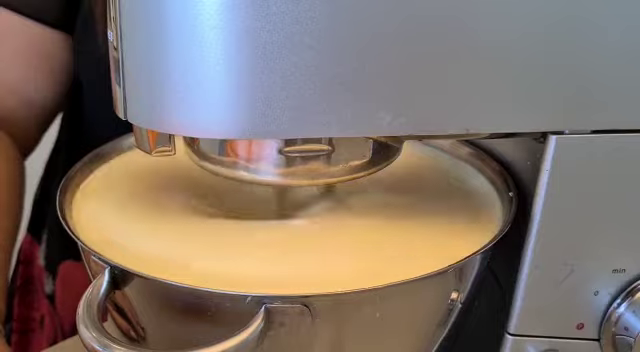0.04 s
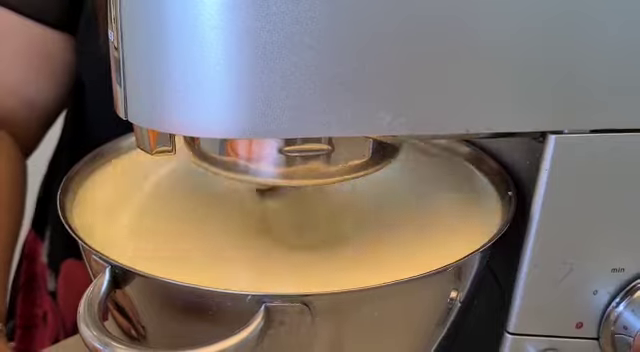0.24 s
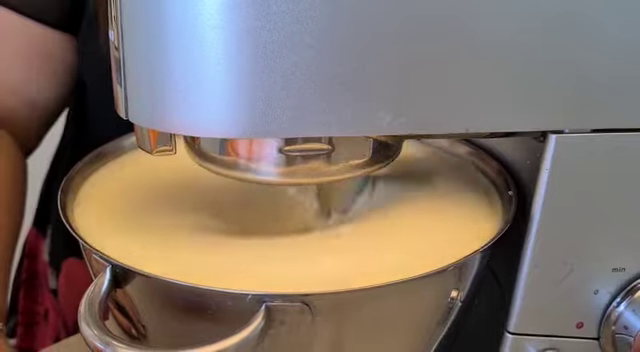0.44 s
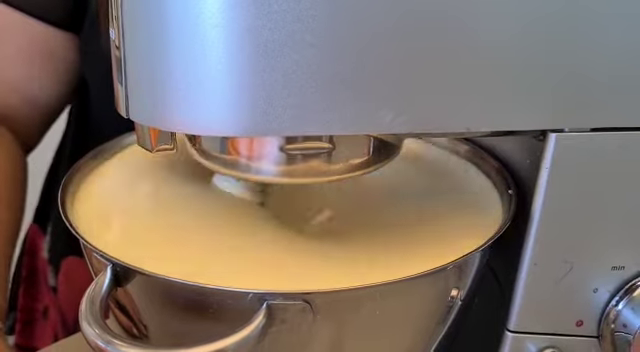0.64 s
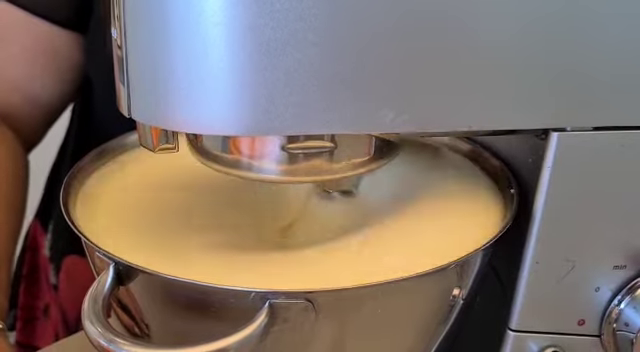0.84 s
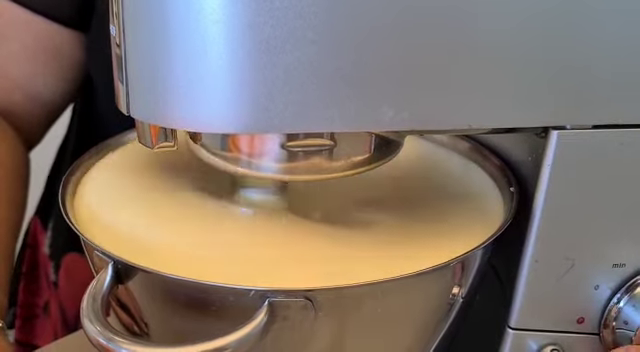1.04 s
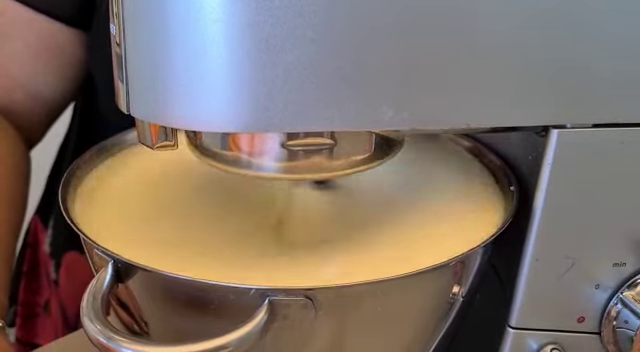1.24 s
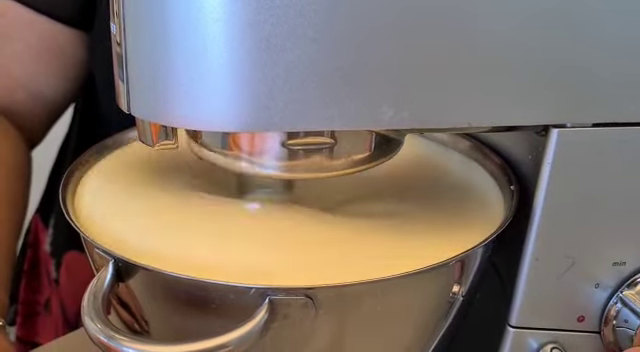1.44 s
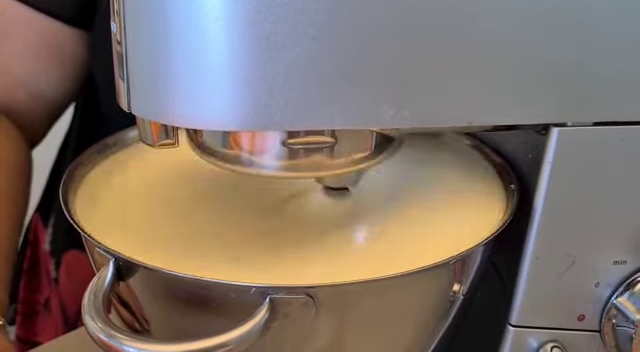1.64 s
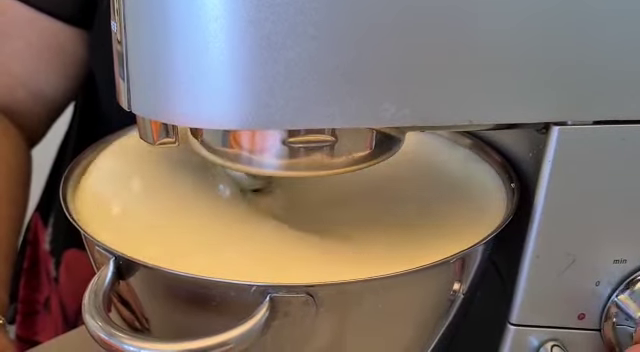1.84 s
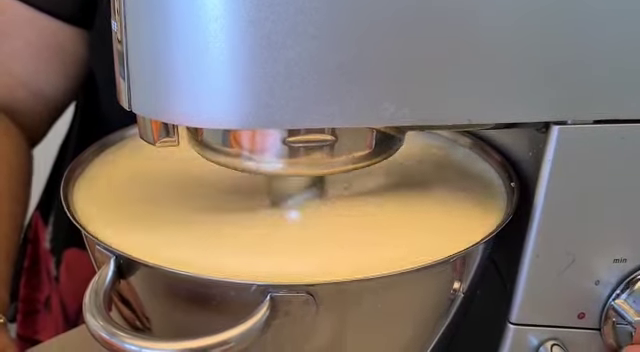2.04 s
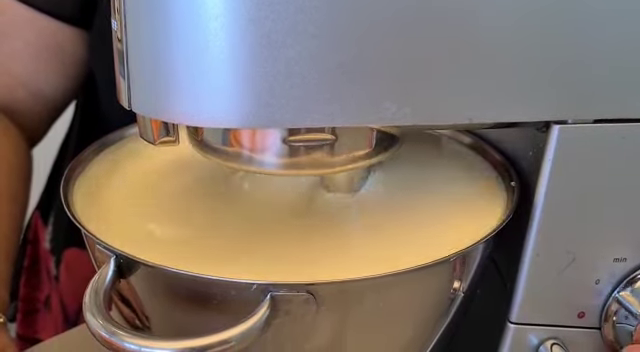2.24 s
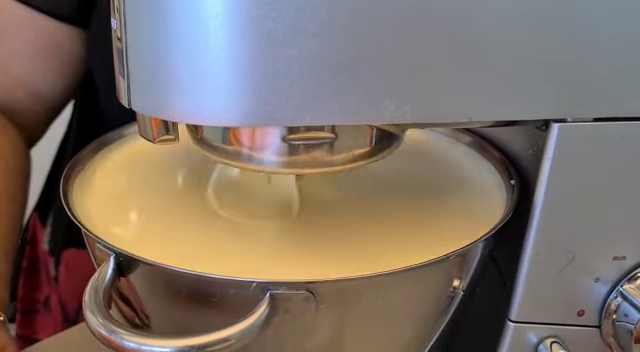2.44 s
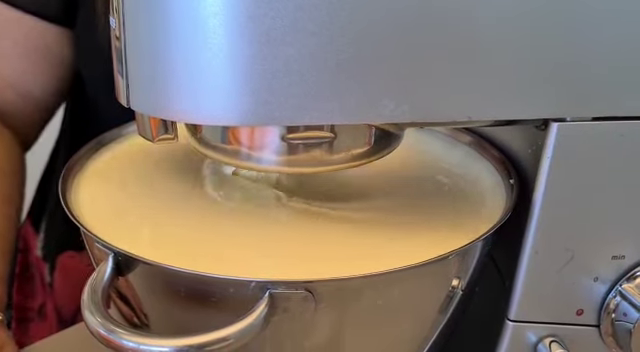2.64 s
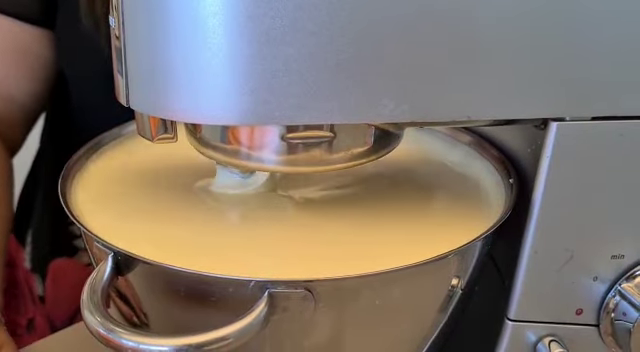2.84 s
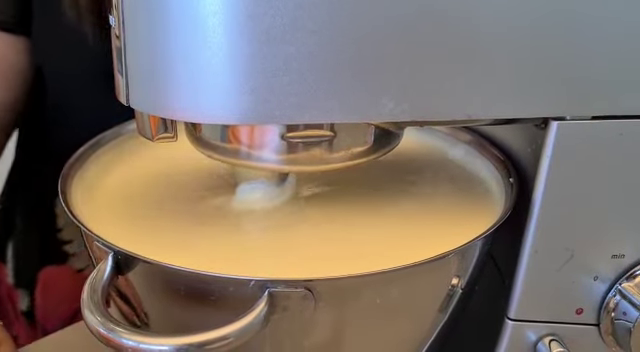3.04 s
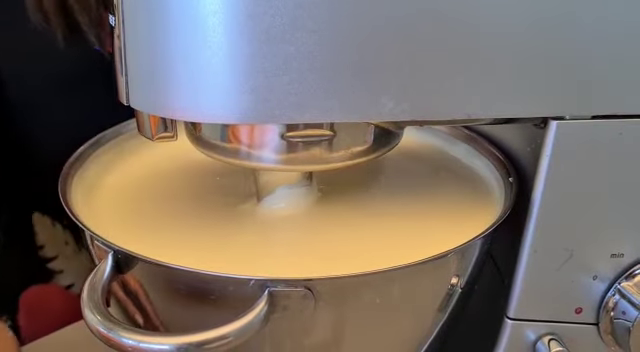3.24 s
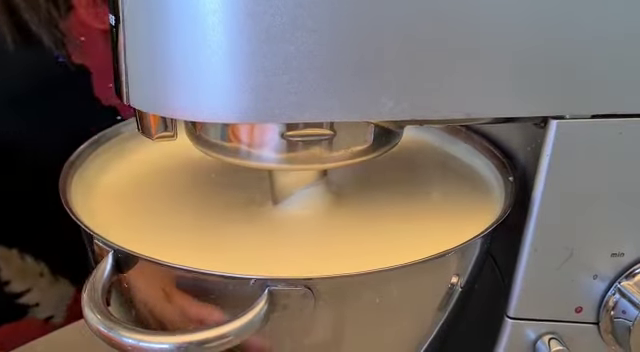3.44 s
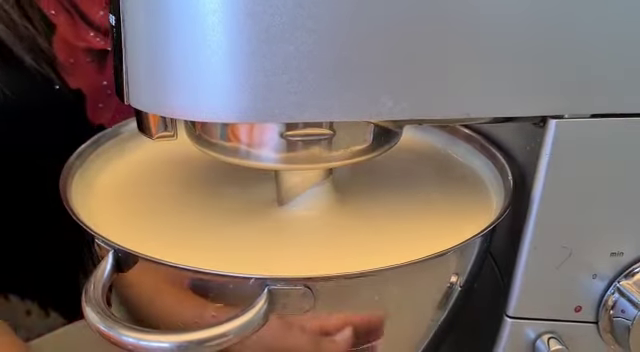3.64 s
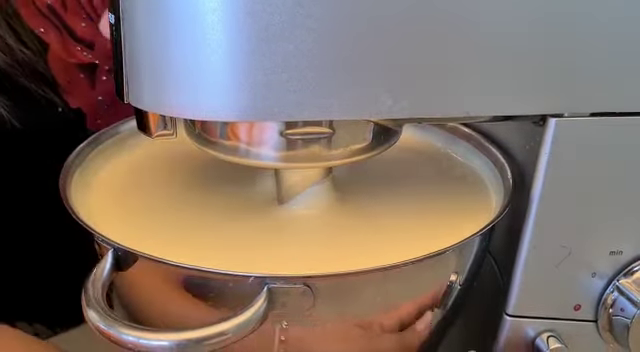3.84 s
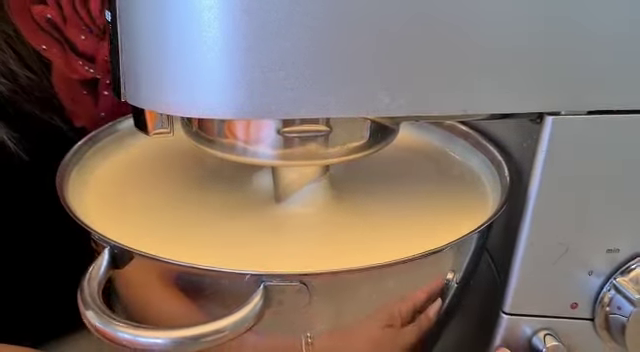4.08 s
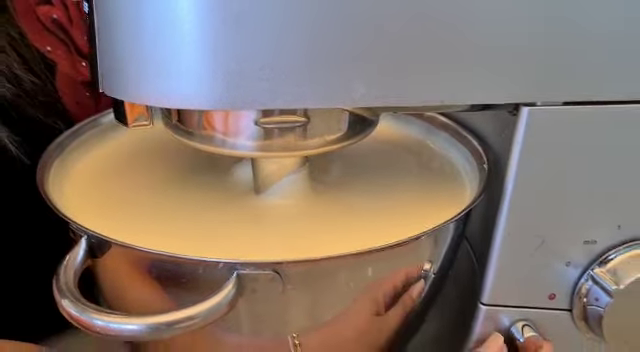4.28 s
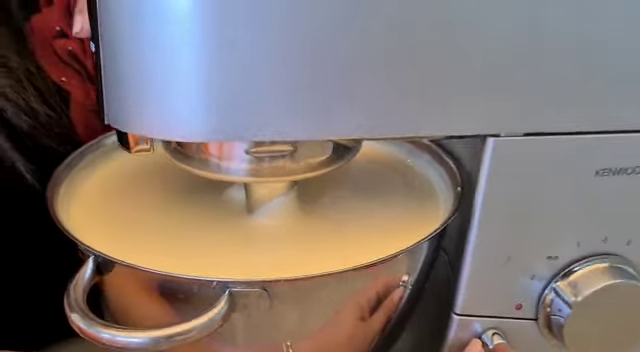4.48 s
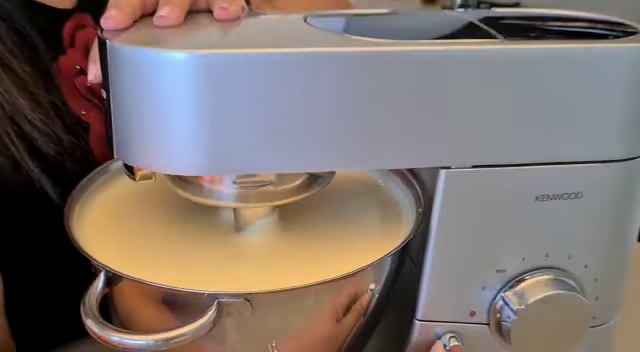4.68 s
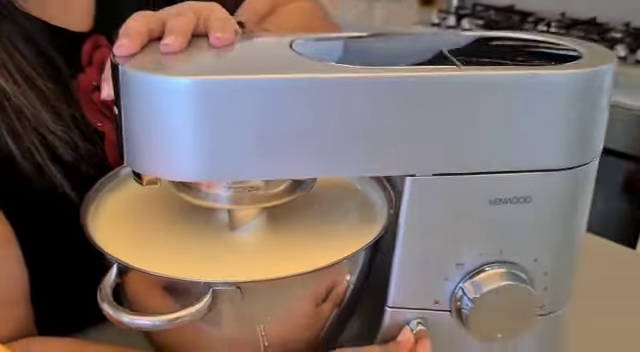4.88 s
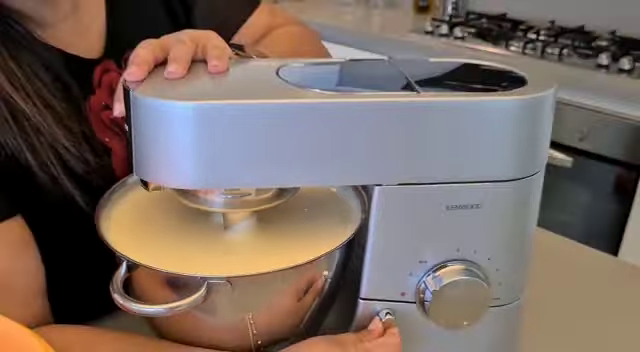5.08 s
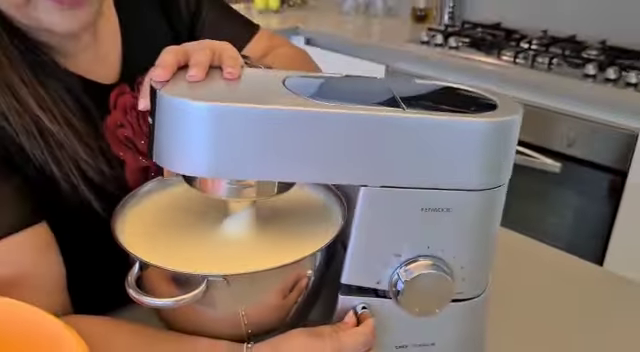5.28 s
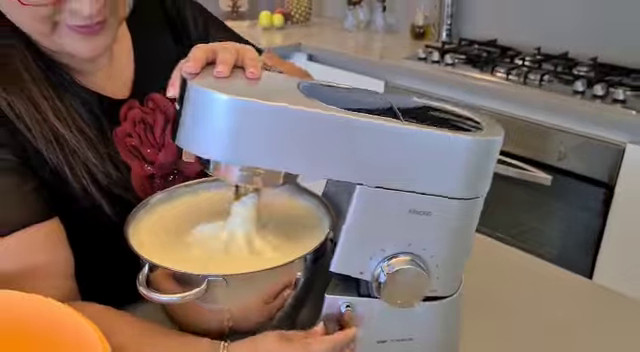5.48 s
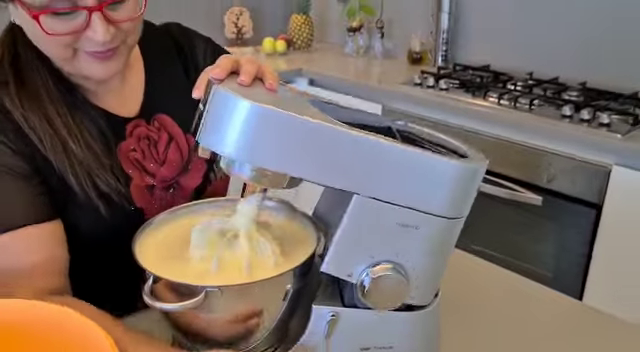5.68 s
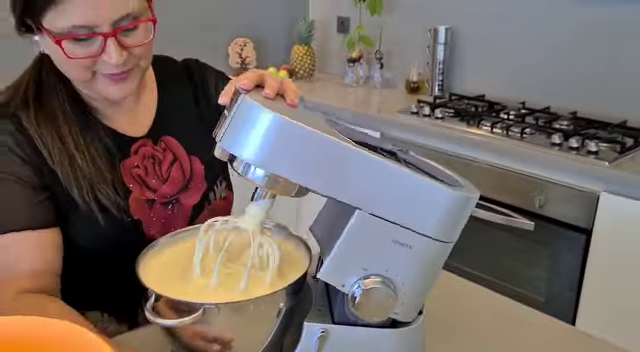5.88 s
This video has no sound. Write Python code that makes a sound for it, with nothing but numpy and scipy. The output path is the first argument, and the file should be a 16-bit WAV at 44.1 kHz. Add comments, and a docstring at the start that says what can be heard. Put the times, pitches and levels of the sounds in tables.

```python
"""A stand mixer beats batter, is switched off and coasts: rotor, gear and commutator tones slide down with
the speed over shaped noise for growl, whirr and hiss. Whisk wires tick on the steel bowl as decaying modes.
The release lever clacks as noise bursts and struck housing modes, then the head rubs up on its hinge as
rough noise. Noise in two bands is the kitchen background, which steps up once. Two microphones, close by."""
import sys
import numpy as np
from scipy import signal
from scipy.fft import rfft, irfft, next_fast_len
from scipy.io import wavfile
from scipy.ndimage import uniform_filter1d, map_coordinates

SR = 44100
rng = np.random.default_rng(int(sys.argv[2]) if len(sys.argv) > 2 else 0)


def wav_record(signal):
    """Record a signal, one row per channel, as 16-bit PCM in the file named by sys.argv[1]."""
    frames = np.transpose(np.atleast_2d(signal))
    bounded = np.clip(frames, -1, 1)
    # unit amplitude maps onto the largest positive 16-bit level
    quanta = np.round(bounded * 32767).astype(np.int16)
    wavfile.write(sys.argv[1], SR, quanta)


N = 260861
T = np.arange(N) / SR  # s

# Rotor speed: (time [s], speed [turns/s])
ROTOR_SPEED = [(0, 182), (.65, 182), (.8, 179), (1.0, 174.6), (1.15, 171.8), (1.28, 167.5), (1.4, 157.5),
               (1.65, 131.6), (1.9, 113), (2.2, 86.5), (2.5, 65), (2.8, 46), (3.1, 29.5), (3.5, 12)]
# Rotor imbalance shaking the stand: (rotor speed [turns/s], level [dB])
UNBALANCE = [(35, -90), (66, -71), (88, -62), (105, -58), (145, -52), (165, -65), (182, -71)]
# Stand modes the mesh tone slides through; response is squared: (frequency [Hz], width [Hz], level [dB])
FRAME_MODES = [(255, 45, 8), (340, 28, 4), (492, 22, 2), (530, 16, 0), (558, 14, -3)]
# Lines around the commutator bar rate: (offset [rotor turns], relative level [dB], blur [rotor turns])
SIDEBANDS = [(-2, -13, .3), (-1, -6, .2), (0, 1, .04), (0, -2, .5), (1, -5, .15), (2, -8, .25),
             (4, -13, .3)]
# Whine harmonics 2 to 4: relative level [dB]
HARMONICS_DB = [1, -8, -12.5]
# Whine leaving the casing, fundamental: (frequency [Hz], relative level [dB])
RADIATED = [(400, -65.5), (750, -74), (1200, -66), (1600, -56.5), (2600, -56.5), (3100, -56), (3380, -56),
            (3700, -54.5), (4370, -58)]
# Whine leaving the casing, harmonics: (frequency [Hz], relative level [dB])
RADIATED_HIGH = [(1000, -88), (1600, -72), (2200, -76), (3100, -75), (3800, -72), (4600, -71.5),
                 (5300, -74), (6200, -68), (7000, -66), (8200, -70), (8740, -62), (9600, -75), (11400, -69),
                 (13100, -64)]
# Motor casing modes: (frequency [Hz], width [Hz], level [dB])
CASING_MODES = [(620, 26, 5), (738, 26, 16.5), (842, 45, 13.5), (1150, 43, 14.5), (1580, 60, 12),
                (2073, 76, 13), (2480, 49, 3), (2820, 45, 8), (3113, 84, 13), (3480, 140, 6.5),
                (4570, 290, 1)]
# Tones under drive: (multiple of rotor speed, level at each of three dial settings [dB])
LOADED_TONES = [(4.165, -62.5, -61, -72), (8.33, -57.5, -64.5, -58.5), (11.5, -60.5, -62, -71),
                (12, -55, -66, -62), (12.55, -69, -61, -56.5)]
# Starts of the two dial steps: time [s]
DIAL_DOWN_S = [0.69, 1.05]
# Magnetic hum: (frequency [Hz], level [dB])
MAINS_HUM = [(102, -65), (204, -51.5), (302, -55.5), (404, -56.5), (528, -65)]
# Gearbox growl spectrum: (frequency [Hz], relative density [dB])
GROWL = [(18, -57), (30, -22), (91, -13), (124, -14), (194, -1.5), (226, -6), (310, 0.5), (429, -8.5),
         (539, -5.5), (668, -17), (737, -13), (900, -17.5), (1170, -48), (1980, -120)]
# Air whirr spectrum: (frequency [Hz], relative density [dB])
WHIRR = [(350, -49), (600, -8.5), (741, -8.5), (1000, -2), (1110, 0), (1350, -7), (1530, -2.5),
         (1940, -4.5), (2140, -3.5), (2330, -5.5), (3410, -9), (4500, -19.5), (5850, -23), (9900, -120)]
# Brush hiss spectrum: (frequency [Hz], relative density [dB])
HISS = [(2350, -73), (4000, -12), (4370, -3.5), (5430, -9.5), (6990, -4.5), (7670, -14), (8630, -7),
        (9880, -12), (11600, -5), (14000, -16.5), (15500, -20), (16300, -34.5)]
# Whisk touches: (time [s], relative level [dB])
TICKS = [(0.0343, -29.5), (0.097, -36.5), (0.1366, -38), (0.179, -42), (0.2478, -45), (0.343, -34.5),
         (0.407, -33), (0.446, -36.5), (0.4918, -44), (0.656, -44), (0.72, -33.5), (0.759, -34.5),
         (0.873, -39.5), (1.039, -36.5), (1.08, -31), (1.1468, -36.5), (1.1902, -41), (1.311, -39),
         (1.3768, -43), (1.4194, -36), (1.495, -35.5), (1.546, -36), (1.698, -44), (1.8462, -45),
         (1.9502, -38), (1.959, -49), (2.0202, -38.5), (2.031, -49), (2.147, -43), (2.2473, -49),
         (2.3376, -52), (2.5176, -60), (2.6885, -46), (2.7095, -53), (2.8355, -55), (2.8589, -60),
         (3.1682, -53), (3.2093, -53)]
# Whisk wire modes: (frequency [Hz], relative level [dB], t60 [s])
WIRE_MODES = [(2520, -9, .03), (3660, -7, .014), (4370, 6, .01), (5240, 0, .012), (6150, 0, .016),
              (9300, 3, .012), (10500, 0, .012), (11680, 2, .016), (13100, -5, .01), (14400, -8, .009)]
# Bowl wall mode: (frequency [Hz], relative level [dB], t60 [s])
BOWL_MODE = (7150, 0, 0.025)
# Timbre around the bowl: (share of the round, low modes [dB], bowl mode [dB])
WALL = [(0.02, -5, -5), (0.11, -17, -3), (0.31, -4.5, -8), (0.43, -16, 2), (0.58, -4, -5),
        (0.65, -1.5, -15), (0.78, -11, 2)]
# Lever contacts: (time [s], relative level [dB], treble [dB], body [dB], thud [dB], rattle [dB])
LEVER_CONTACTS = [(4.783, -48.5, -15, -3, 0, 0), (4.846, -30.5, -9, 3, -1, -4), (4.856, -21, 3.5, 5, 0, 4),
                  (4.861, -23, 0.5, 0, -1.5, 0), (4.88, -25, -5.5, -1, 0, 5.5),
                  (4.899, -28, -5, -6, -1.5, 0), (5.153, -33, -14, -2.5, -10, -8),
                  (5.162, -35, -2, -4, 8, -6), (5.177, -45.5, -2, 10.5, 1, -6),
                  (5.334, -41.5, -18, -4, 10, 8), (5.821, -41.5, -6.5, 8, -3, 3.5)]
# Contact burst spectrum: (frequency [Hz], relative density [dB])
CLACK = [(47, -50), (80, -7), (228, 1.5), (260, 0.5), (332, -9), (485, -3), (707, -16), (987, -5.5),
         (1400, -12), (1760, -10), (2060, -2), (3100, -7), (5120, -16), (11400, -13), (16300, -29)]
# Housing modes: (frequency [Hz], width [Hz], relative level [dB])
HOUSING_MODES = [(200, 71, -6.5), (356, 53, 0), (481.5, 24, 5.5), (980, 100, 2.5), (1495, 120, 3.5),
                 (2000, 180, 3), (2130, 83, 3), (3110, 57, 0.5), (3760, 64, -30), (4860, 470, -33),
                 (6830, 210, -6), (10340, 450, -10.5)]
# Head slides: (start [s], length [s], level [dB], shudder re slide [dB], fade after the slide [dB/s])
SLIDES = [(5.307, 0.19, -47.5, -9, 196), (5.52, 0.12, -56.5, -16, 60), (5.8, 0.062, -66.5, -9, 60)]
# Hinge rub spectrum: (frequency [Hz], relative density [dB])
RUB = [(240, -30), (400, 4.5), (536, -2), (777, -7.5), (950, -2), (1140, -7.5), (1270, -4), (1500, -4),
       (1850, 4), (2150, -3), (2500, -1.5), (2970, -1.5), (3310, -11), (3750, -5.5), (4300, -8.5),
       (4700, -18), (5200, -17.5), (6300, -22.5), (7200, -23.5), (7700, -30.5), (10200, -29), (16000, -47)]
# Arm modes singing in the rub: (frequency [Hz], width [Hz], relative level [dB])
STREAKS = [(903, 40, -10), (1270, 17, -4), (1915, 54, -1), (2400, 46, 3), (2990, 23, 0.5), (3750, 90, 1),
           (4660, 80, -12), (7140, 130, -15)]
# Kitchen background: (time [s], low band level [dB], high band level [dB])
AIR_LEVELS = [(2.9, -62.5, -66), (3.77, -65.5, -71.5), (3.79, -59, -64.5), (4.45, -59.5, -64),
              (4.83, -58.5, -61.5), (5.3, -62.5, -63.5), (5.9, -61, -62.5)]
# Background low band: (frequency [Hz], relative density [dB])
AIR_LOW = [(15, -47), (25, -23.5), (75, -13), (113, -9.5), (188, -2.5), (303, -9), (335, -10), (461, -13),
           (800, -25.5), (1040, -47), (1760, -120)]
# Background high band: (frequency [Hz], relative density [dB])
AIR_HIGH = [(320, -30), (550, -7.5), (959, -4.5), (1180, -5), (1300, -7), (1930, -7), (3200, -16),
            (3510, -20), (5360, -32), (5800, -28), (7260, -35.5), (11100, -34.5), (12200, -36),
            (13000, -69)]
# Kitchen reverberation: (frequency [Hz], t60 [s])
KITCHEN_T60 = [(150, 0.39), (1000, 0.63), (4000, 0.89), (12000, 0.41)]
# Stereo likeness: (frequency [Hz], left-right correlation)
ALIKE = [(60, 0.98), (230, 0.985), (380, 0.8), (950, 0.4), (2380, 0.03), (5980, -0.14), (15000, 0.02)]
# Stereo balance: (frequency [Hz], left over right [dB])
LEAN = [(60, -0.5), (130, 0), (290, -2.5), (640, -2), (1410, -2), (3100, -3.5), (6820, -3), (15000, -1.5)]
# Stereo phase: (frequency [Hz], left lead [rad])
LAG = [(500, 0), (1100, .4), (2200, -1.9), (3100, -3.3)]

SWITCH_OFF_S, REST_S = 1.44, 3.5  # current is gone, its fade starts 0.128 s before; motor and drive silent
BARS = 24  # commutator bars per rotor turn
DRIVEN_BLUR = 0.4  # share of the whine's blur left while current steadies the rotor
MESH_ORDER, MESH_DB, MESH_DB_OCT = 3.07, -54, 12  # multiple of rotor speed, gain before the frame, dB/octave
GROWL_DB, WHIRR_DB, HISS_DB = -44.5, -49.5, -57  # at full speed under current
GROWL_DB_OCT, WHIRR_DB_OCT, HISS_DB_OCT = 10, 9, 13  # lost per halving of speed
UNLOADED_DB = -1.5  # drive gain without current
ORBIT_TURNS = 56.8  # rotor turns per whisk round
RING_DB = 27  # housing ring gain
RATTLES_PER_S, RATTLE_DB, RATTLE_T60_S = 350, -10.5, 0.28
SLIDE_RISE_S, SLIDE_TREBLE_DB, STREAK_DB = 0.066, -15.5, -17
TOP_HZ = 16200


def motor():
    """Shaft, mesh and whine follow the rotor; hum and load tones fade with the current."""
    turns, = curves(ROTOR_SPEED)
    running = np.clip((REST_S - T) / 0.048, 0, 1)
    current = np.clip((SWITCH_OFF_S - T) / 0.128, 0, 1)
    return running * (shaft(turns) + whine(turns, current)) + current * (load_tones(turns) + mains_hum())


def shaft(turns):
    """Rotor imbalance and gear mesh, the mesh coloured by the stand's modes."""
    octaves = np.log2(turns / turns[0])
    mesh_hz = MESH_ORDER * turns
    frame = sum(abs(resonances([mode])(mesh_hz)) ** 2 for mode in FRAME_MODES)
    mesh_gain = amp(MESH_DB + MESH_DB_OCT * octaves) * frame * amp(4.0 * wobble(7.1))
    unbalance_gain = amp(along(UNBALANCE, turns))
    unbalance = unbalance_gain * tone(turns, blur_hz=1.65, flutter_db=1.0, rate=20)
    return unbalance + mesh_gain * tone(mesh_hz, blur_hz=1.65, flutter_db=1.0, rate=20)


def whine(turns, current):
    """Brushes on uneven bars give rough clusters that flare as they slide through casing modes."""
    loose = 1 - (1 - DRIVEN_BLUR) * current

    def cluster(harmonic):
        """Blurred lines at rotor-turn offsets from one harmonic of the bar rate, rms 1."""
        lines = 0
        for offset, db, blur in SIDEBANDS:
            blur_hz = loose * blur * harmonic * turns + 3
            lines = lines + amp(db) * tone((harmonic * BARS + offset) * turns, blur_hz, flutter_db=4, rate=120)
        return unit(lines)

    bare = amp(along(RADIATED, BARS * turns)) * cluster(1)
    for harmonic, db in enumerate(HARMONICS_DB, 2):
        bare = bare + amp(db + along(RADIATED_HIGH, harmonic * BARS * turns)) * cluster(harmonic)
    return amp(-4.5 + 0.78 * wobble(24.99)) * (bare + filtered(bare, resonances(CASING_MODES)))


def load_tones(turns):
    """Shaft orders under drive, their levels moved by two dial steps."""
    dial = sum(np.clip((T - start) / 0.056, 0, 1) for start in DIAL_DOWN_S)
    total = 0
    for order, *levels_db in LOADED_TONES:
        gain = amp(np.interp(dial, range(len(levels_db)), levels_db))
        total = total + gain * tone(order * turns, blur_hz=1.5, flutter_db=1.2, rate=20)
    return total


def mains_hum():
    """Magnetic hum at fixed, slightly blurred frequencies."""
    return sum(amp(db) * tone(np.full(N, hz), blur_hz=3.82, flutter_db=1.5, rate=25) for hz, db in MAINS_HUM)


def drive():
    """Gearbox growl, air whirr and brush hiss die away with the speed."""
    turns, = curves(ROTOR_SPEED)
    octaves = np.log2(turns / turns[0])
    unloaded = np.clip((T - SWITCH_OFF_S) / 0.22, 0, 1)
    running = amp(UNLOADED_DB * unloaded) * np.clip((REST_S - T) / 0.12, 0, 1)
    load = wobble(9.25)  # batter drags unevenly on the whisk
    growl = amp(GROWL_DB + GROWL_DB_OCT * octaves + 1.0 * load) * rush(GROWL, patchy_db=0.5)
    whirr = amp(WHIRR_DB + WHIRR_DB_OCT * octaves + 0.6 * load) * rush(WHIRR, patchy_db=1.5)
    hiss = amp(HISS_DB + HISS_DB_OCT * octaves + 0.33 * wobble(31.0)) * rush(HISS, patchy_db=2.5)
    return running * (growl + whirr + hiss)


def whisk():
    """Each wire touch is a dry click that briefly rings the wires and the bowl wall."""
    out, t = np.zeros(N + SR), T[:SR // 8]
    rise = 1 - np.exp(-t / 0.004)  # batter cushions the touch
    low = [mode for mode in WIRE_MODES if mode[0] < BOWL_MODE[0]]
    high = [mode for mode in WIRE_MODES if mode[0] > BOWL_MODE[0]]
    rounds = np.cumsum(curves(ROTOR_SPEED)[0]) / SR / ORBIT_TURNS
    place, place_low_db, place_bowl_db = np.transpose(WALL)
    for s, db in TICKS:
        start = round(s * SR)
        low_db = np.interp(rounds[start], place, place_low_db, period=1)
        bowl_db = np.interp(rounds[start], place, place_bowl_db, period=1)
        ring = ringing(high, t, 3)
        ring = ring + amp(low_db + 7) * ringing(low, t, 3.5)
        ring = ring + amp(bowl_db) * ringing([BOWL_MODE], t, 1)
        colour = [(2500, -53), (4000, low_db + 9.0), (6500, low_db + 4.5), (9000, 0.0)]  # Hz, dB
        grit = unit(filtered(rng.standard_normal(len(t)), lambda hz: amp(along(colour, hz))))
        crack = 3.2 * amp(-60 * t / 0.022) * grit
        out[start:][:len(t)] += amp(db - 10.5) * (ring + crack) * rise
    dry = out[:N]
    return direct(dry, pan_db=-9.0, lead_s=-0.000287) + amp(-8.5) * room(dry)


def lever():
    """Each contact is a noise burst and a blow ringing the housing and its loose parts; the room answers."""
    bursts, rings, t = np.zeros(N + SR), np.zeros(N + SR), T[:SR // 4]
    rise = np.clip(t / 0.002, 0, 1) ** 2  # contact closes over 2 ms
    blow = np.arange(len(t)) == 60  # 60 samples after first touch
    for s, db, treble_db, body_db, thud_db, rattle_db in LEVER_CONTACTS:
        start = round(s * SR)
        tilt = [(300, thud_db), (1100, body_db), (2600, 0), (7000, treble_db)]  # Hz, dB
        noise = rng.standard_normal(len(t))
        burst = unit(filtered(noise, lambda hz: amp(along(CLACK, hz) + along(tilt, hz))))
        shaken = [(hz * (1 + 0.04 * rng.standard_normal()), width, level + along(tilt, hz))
                  for hz, width, level in HOUSING_MODES]
        hits = (rng.random(len(t)) < RATTLES_PER_S / SR) * rng.standard_normal(len(t))
        chatter = hits * amp(RATTLE_DB + rattle_db - 60 * t / RATTLE_T60_S)
        ring = filtered(chatter + blow, resonances(shaken))
        bursts[start:][:len(t)] += amp(db - 5.0) * burst * amp(-60 * t / 0.043) * rise
        rings[start:][:len(t)] += amp(db + RING_DB) * ring
    dry, to_room = (bursts + rings)[:N], (bursts + amp(-6) * rings)[:N]
    return direct(dry, pan_db=-2, lead_s=0.00025) + amp(-2) * room(to_room)


def hinge():
    """The head rubs on hinge and catch: rough noise, singing arm modes and a low shudder."""
    sliding, shaking = 0, 0
    for start, length, db, shudder_db, fade in SLIDES:
        onset = np.clip((T - start) / SLIDE_RISE_S, 0, 1)
        move = amp(db - fade * np.maximum(T - start - length, 0)) * onset
        sliding = sliding + move
        shaking = shaking + amp(shudder_db) * move
    grit = unit(amp(1.2 * wobble(900) + 0.7 * wobble(150) + 0.4 * wobble(30)))
    rub = rush(RUB, patchy_db=0.7)
    streaks = 0
    for hz, width, db in STREAKS:
        band = unit(filtered(rub, resonances([(hz, width, 0)])))
        streaks = streaks + amp(db + 3.2 * wobble(11)) * band
    top = unit(filtered(rub, lambda hz: hz > 5000))
    body = unit(filtered(rub, lambda hz: hz < 5000))
    rough = body + amp(SLIDE_TREBLE_DB) * top + amp(STREAK_DB) * streaks
    shudder = rush([(25, -30), (60, -3), (110, 0), (300, -5), (500, -14), (700, -60)], patchy_db=1.5)
    return sliding * grit * rough + shaking * shudder


def air():
    """Kitchen background: low and high noise bands on slow level curves."""
    low_db, high_db = curves(AIR_LEVELS)
    low = amp(low_db + 0.66 * wobble(4.264)) * rush(AIR_LOW, patchy_db=0.5)
    return low + amp(high_db) * rush(AIR_HIGH, patchy_db=1.1)


def room(x):
    """Reverberation: a noise tail 350 samples late, each frequency dying at its own speed."""
    hz, t, z = signal.stft(rng.standard_normal((2, SR)), SR, nperseg=256)
    decay = amp(-60 * t / along(KITCHEN_T60, hz)[:, None])
    tail = paired(signal.istft(z * decay, SR, nperseg=256)[1], np.ones_like)
    tail = tail / np.linalg.norm(tail[0])
    return signal.fftconvolve(np.pad(x, (350, 0))[None], tail, axes=1)[:, :N]


def direct(x, pan_db, lead_s):
    """Straight path: positive pan is louder, positive lead earlier, on the left."""
    sides = np.array([[1], [-1]])
    return filtered(x, lambda hz: amp(sides * pan_db / 2) * np.exp(1j * np.pi * hz * lead_s * sides))


def paired(two, colour):
    """Two unrelated signals mixed to left and right: alike in the bass, unrelated in the treble."""
    def spread(hz):
        angle = np.arccos(np.clip(along(ALIKE, hz), -1, 1)) / 2
        return colour(hz) * [np.cos(angle), np.sin(angle)]

    def half(hz):
        return amp(along(LEAN, hz) / 2) * np.exp(0.5j * along(LAG, hz))

    a, b = filtered(two, spread)
    return filtered(np.array([a + b, a - b]), lambda hz: np.array([half(hz), 1 / half(hz)]))


def rush(spectrum, patchy_db):
    """Stereo noise of rms 1 with time-frequency patches of random gain."""
    z = signal.stft(rng.standard_normal((2, N)), nperseg=512)[2]
    field = uniform_filter1d(rng.standard_normal(z.shape[1:]), size=5, axis=0)
    field = uniform_filter1d(field, size=8, axis=1)
    two = signal.istft(z * amp(patchy_db * unit(field)), nperseg=512)[1][:, :N]
    return unit(paired(two, lambda hz: amp(along(spectrum, hz))))


def tone(hz, blur_hz, flutter_db, rate):
    """Unsteady tone; microphone phase difference grows with pitch up to a limit, right 2 dB louder."""
    phase = 2 * np.pi * (np.cumsum(hz + blur_hz * wobble(rate)) / SR + rng.random())
    apart = np.minimum(hz / 2000, 0.8) * (1 + 0.25 * wobble(10)) * [[1], [-1]]
    flutter = unit(amp(flutter_db * wobble(rate)))
    return np.sqrt(2) * flutter * np.sin(phase + apart) * amp([[-1], [1]])


def ringing(modes, t, spread_db):
    """Struck modes, each at a random strength, phase and slightly shifted pitch."""
    total = 0
    for hz, db, t60 in modes:
        decay = amp(db + spread_db * rng.standard_normal() - 60 * t / t60)
        struck_hz = hz * (1 + 0.025 * rng.standard_normal())
        total = total + decay * np.sin(2 * np.pi * (struck_hz * t + rng.random()))
    return total


def resonances(modes):
    """Causal response of (frequency [Hz], width [Hz], level [dB]) modes, alternating in sign."""
    def response(f):
        return sum((-1) ** k * amp(db) * 1j * f * width / (hz * hz - f * f + 1j * f * width)
                   for k, (hz, width, db) in enumerate(modes))
    return response


def filtered(x, response):
    """x through a complex frequency response, zero-padded."""
    m = next_fast_len(x.shape[-1] + 8192)
    return irfft(rfft(x, m) * response(np.fft.rfftfreq(m, 1 / SR)), m)[..., :x.shape[-1]]


def wobble(rate):
    """Smooth random curve, rate knots per second."""
    return map_coordinates(rng.standard_normal(int(N * rate / SR) + 4), [T * rate])


def curves(rows):
    """One per-sample curve for each column after the time."""
    s, *cols = np.transpose(rows)
    return [np.interp(T, s, c) for c in cols]


def along(points, hz):
    """Interpolate (frequency [Hz], value) points on a log axis."""
    f, v = np.transpose(points)
    return np.interp(np.log(hz + 1), np.log(f + 1), v)


def unit(x):
    """x at rms 1."""
    return x / np.sqrt(np.mean(x ** 2) + 1e-20)


def amp(db):
    """Gain of a level in dB."""
    return 10 ** (np.asarray(db) / 20)


def scene():
    """All sources at the two microphones."""
    return motor() + drive() + whisk() + lever() + hinge() + air()


def record(dry):
    """Band limit: nothing kept from TOP_HZ up."""
    return filtered(dry, lambda hz: hz < TOP_HZ)


dry = scene()
out = record(dry)
wav_record(out)
```